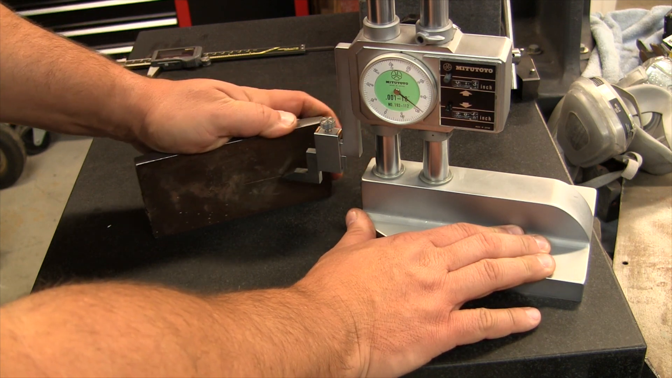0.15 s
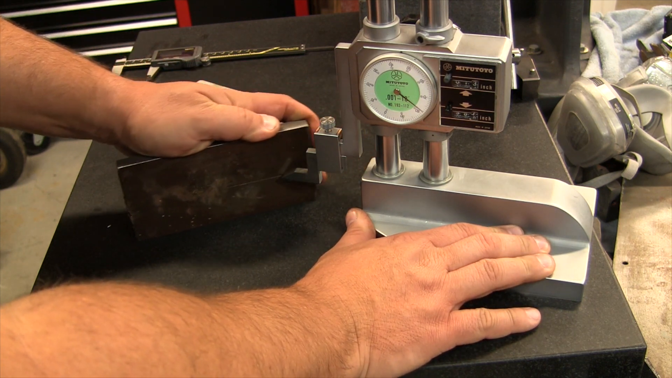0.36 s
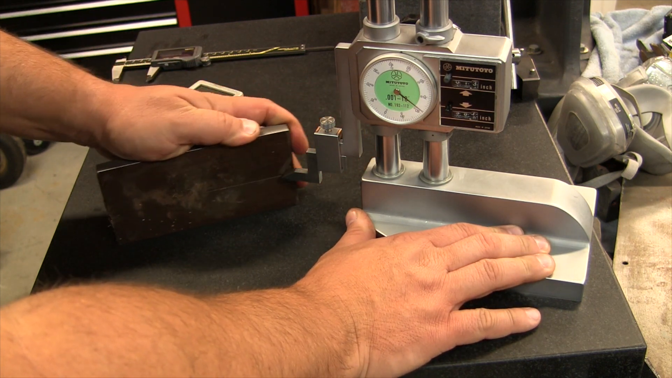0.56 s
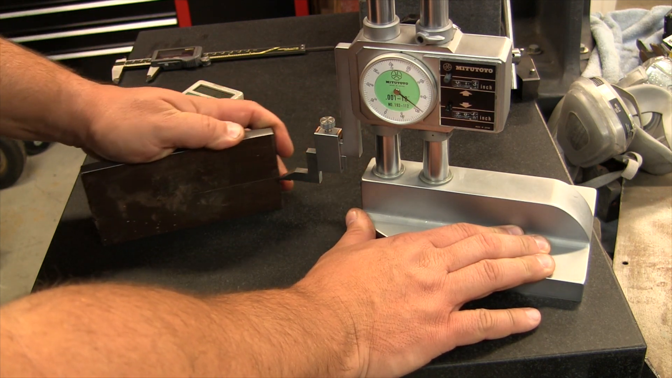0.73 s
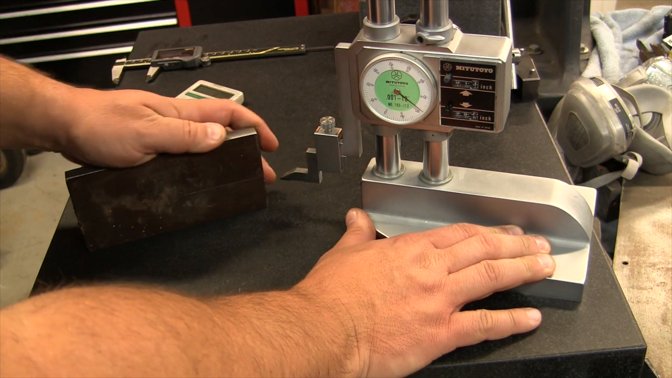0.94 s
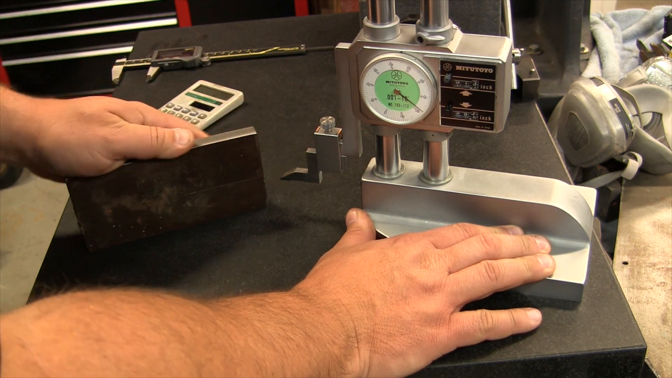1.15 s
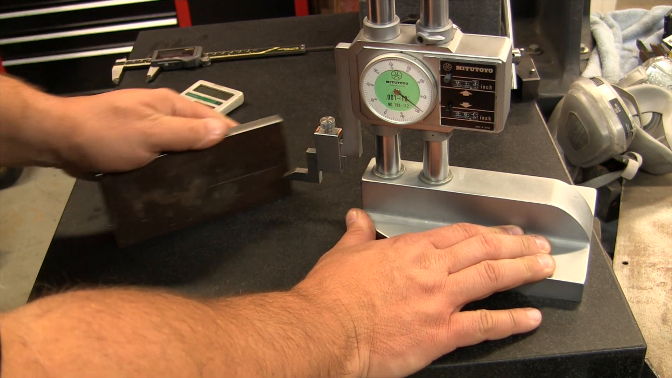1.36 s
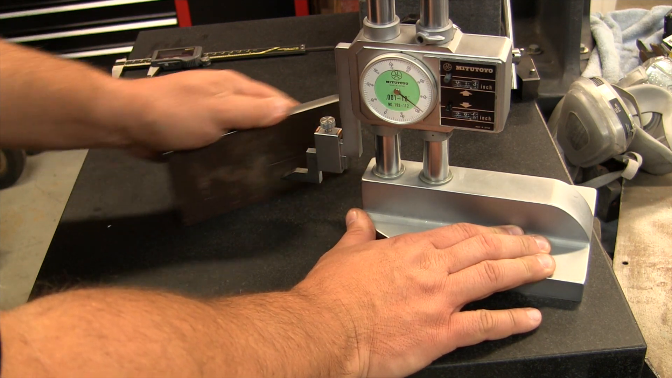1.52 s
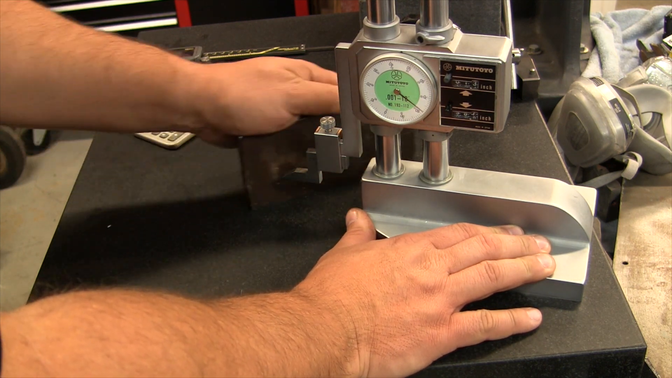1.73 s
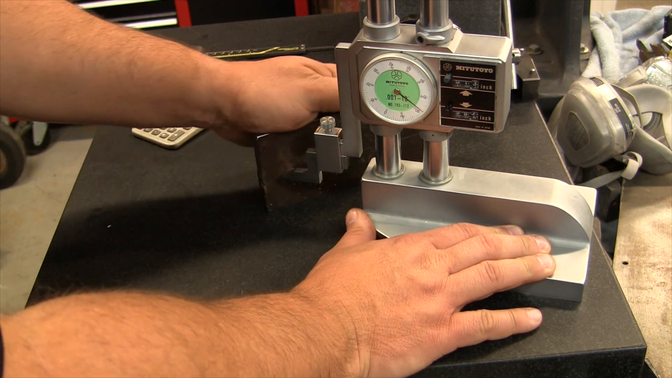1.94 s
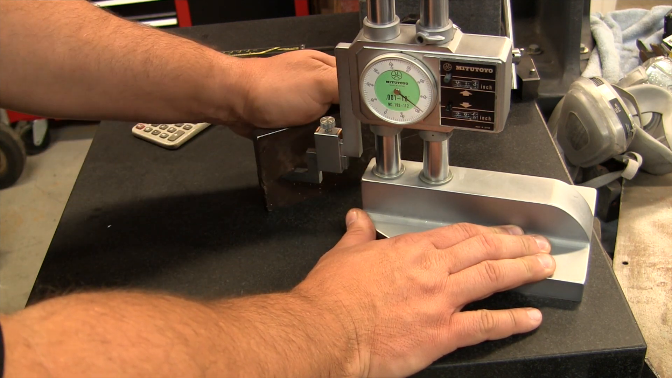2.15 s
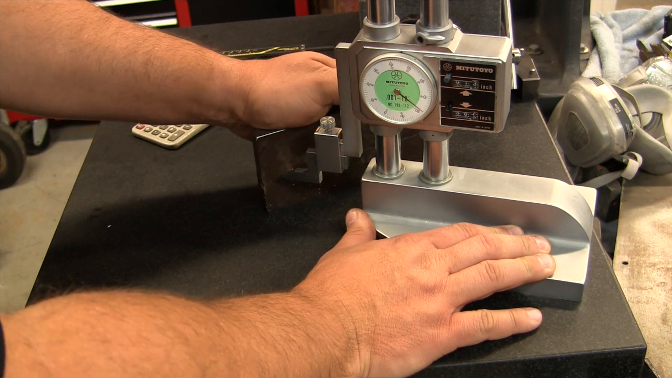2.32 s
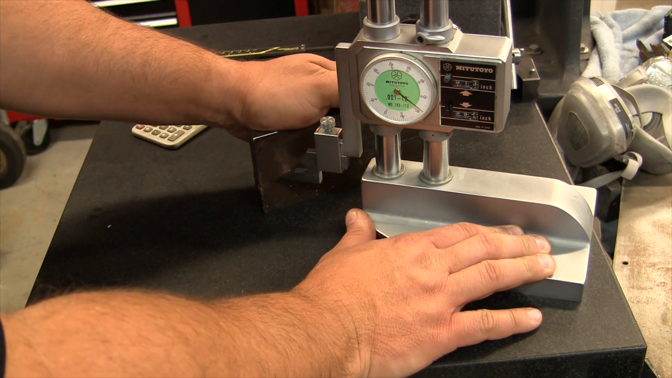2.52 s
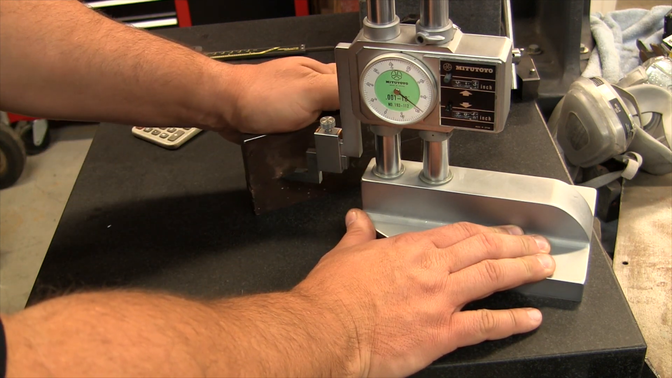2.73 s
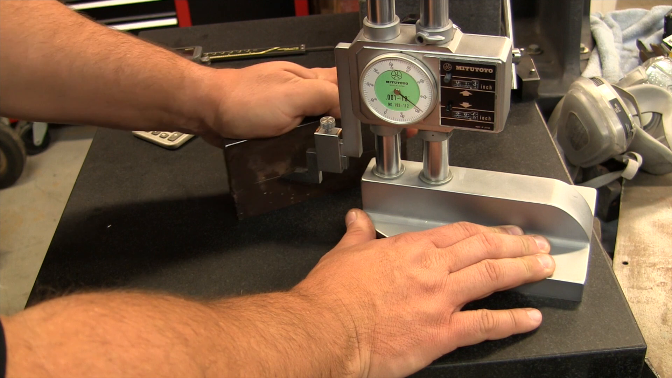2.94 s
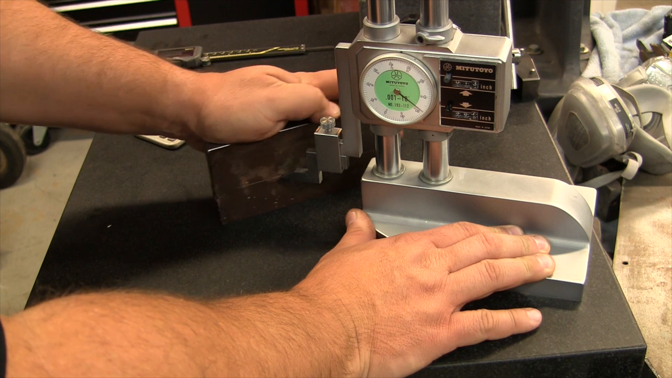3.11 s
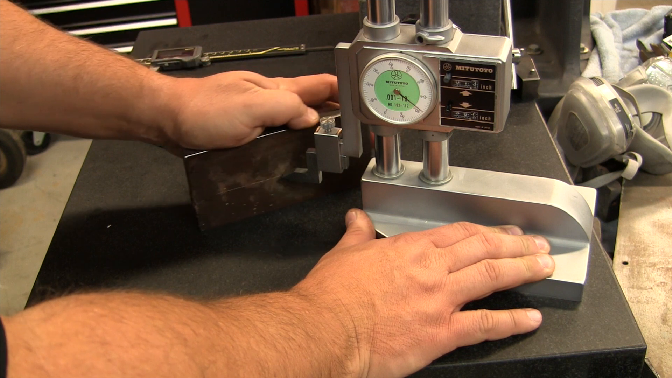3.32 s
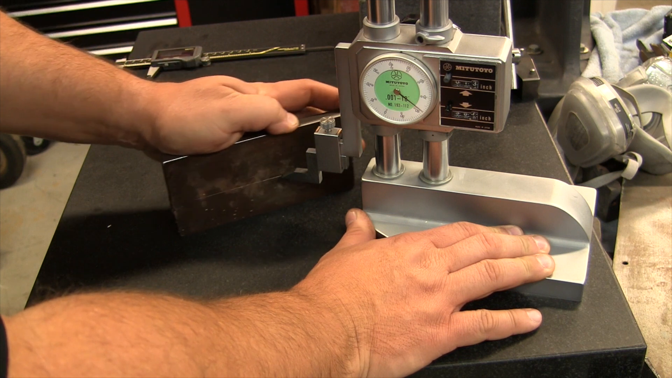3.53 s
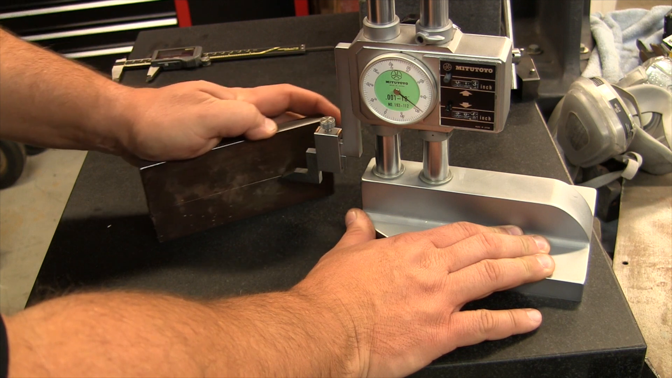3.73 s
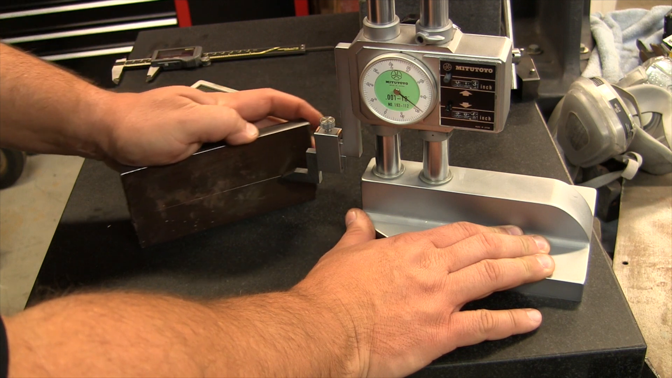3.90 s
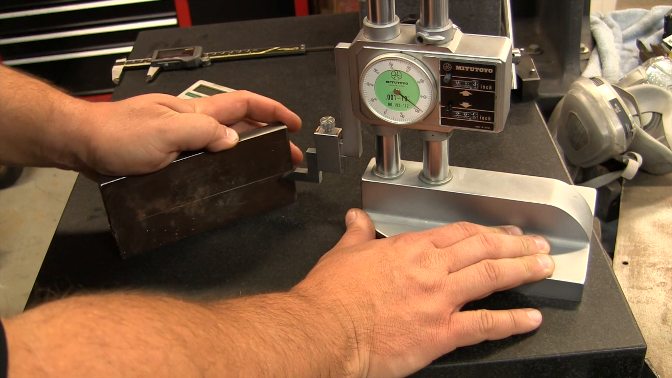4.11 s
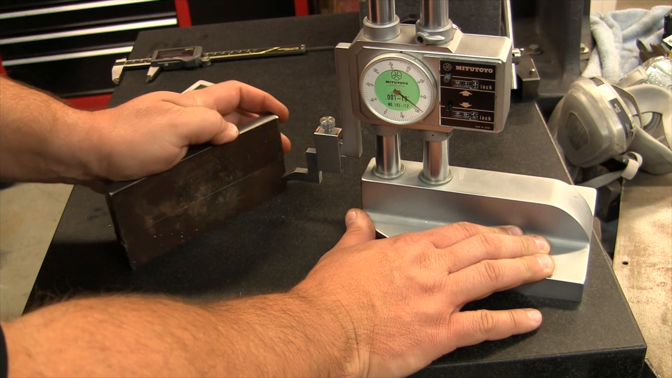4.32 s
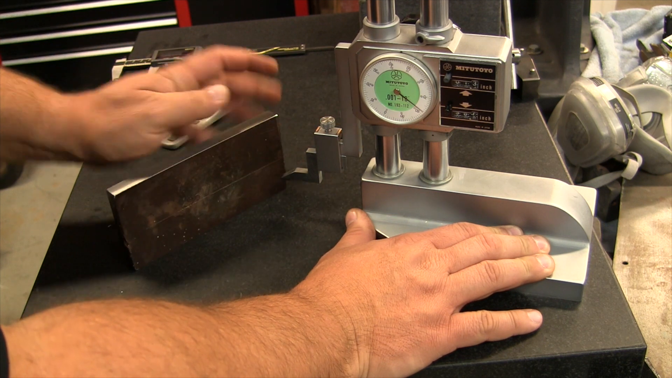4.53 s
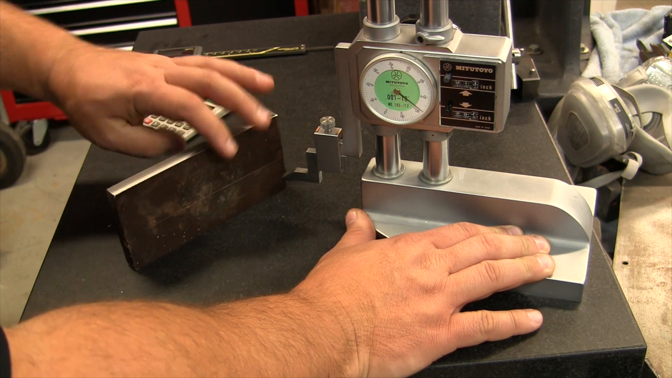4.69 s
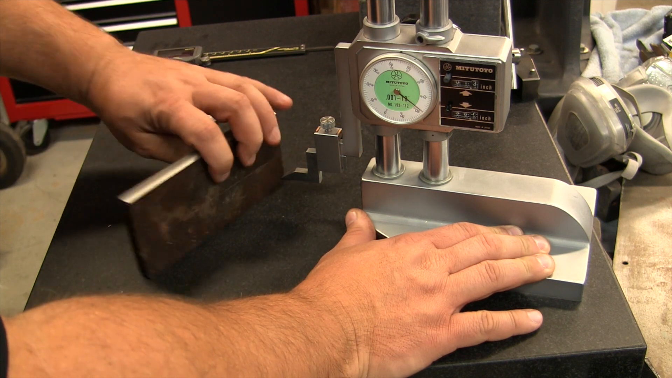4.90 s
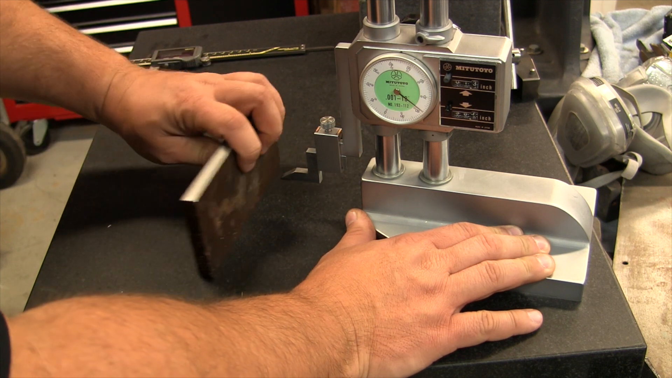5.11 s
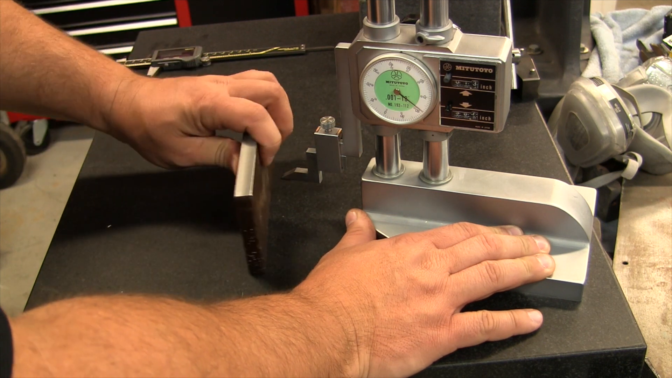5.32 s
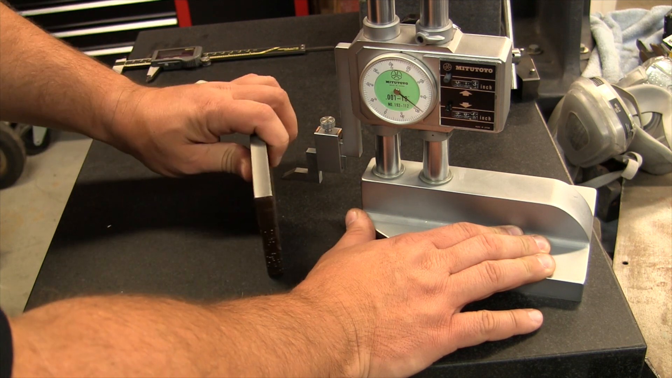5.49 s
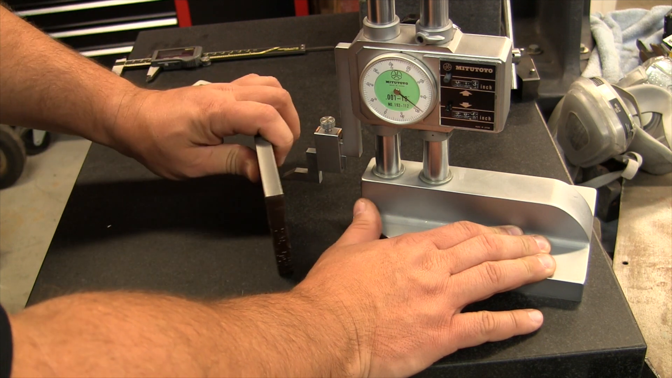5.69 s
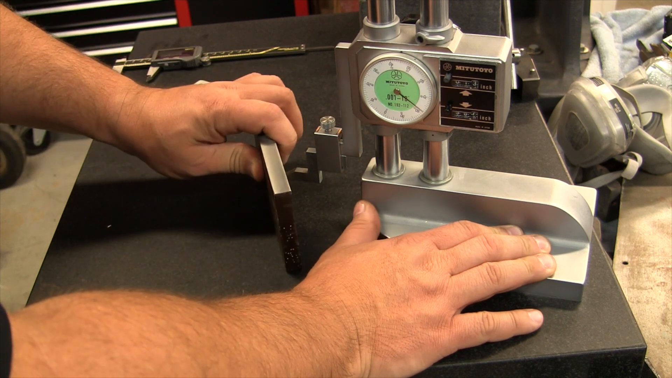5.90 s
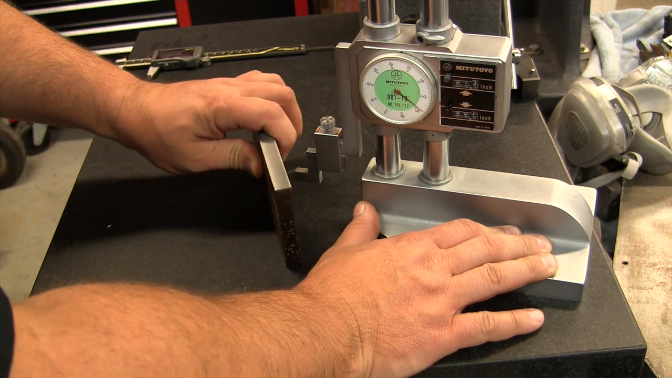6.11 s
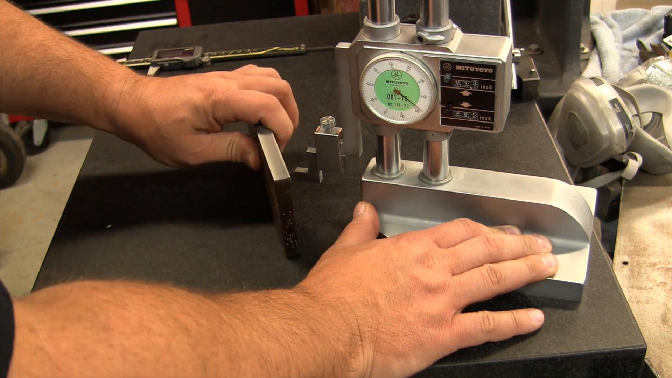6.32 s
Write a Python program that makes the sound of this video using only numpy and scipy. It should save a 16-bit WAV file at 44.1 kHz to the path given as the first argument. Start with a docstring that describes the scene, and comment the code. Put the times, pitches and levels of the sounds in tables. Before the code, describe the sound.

A hard steel point scratches metal twice with sharp snaps; the block rasps and squeaks over granite and knocks once brightly, over faint fan hum.

```python
"""First comes a harsh scrape: a steel block is pulled past the pointed tip (scriber) of a height gauge.
A second long scrape follows later; tiny random slips shake the tip and the gauge, with sharp snaps.
Between and after these, the block rasps and squeals on a granite plate as grit drives its vibrations.
It grinds on its corners and knocks on the stone with thuds and one strong ring; the gauge is nudged.
Behind it all, in a small workshop, are soft air noise and the steady tones of a fan motor."""
import sys
import numpy as np
from scipy import signal
from scipy.fft import rfft, irfft
from scipy.io import wavfile
from scipy.ndimage import uniform_filter1d

SR = 44100
rng = np.random.default_rng(int(sys.argv[2]) if len(sys.argv) > 2 else 0)


def output_pcm(signal):
    """Save a mono or channel-first signal as 16-bit PCM at the path in sys.argv[1].

    Samples are clipped to [-1, 1] before scaling.
    """
    pcm = np.clip(np.atleast_2d(signal).T, -1, 1) * 32767
    wavfile.write(sys.argv[1], SR, np.round(pcm).astype(np.int16))


N = 280035
T = np.arange(N) / SR  # time in seconds
RING_T = T[:SR // 2]  # time axis of short sounds: half a second

# Levels in the tables are starting points: the functions below add small trims.
# the steel is drawn past the tip: start t/s, rise t/s, hold t/s, release t/s, drag level/dB, bite level/dB
STROKES = [(0.0, 0.0033, 0.723, 0.078, -34.5, -47), (2.388, 0.005, 0.04, 0.037, -43, -63),
           (2.543, 0.054, 1.434, 0.035, -34.5, -48.5)]
# the tip digs deeper for a moment: t/s, half length t/s, extra bite level/dB
DIGS = [(0.042, 0.014, 10), (0.393, 0.051, 2.5), (0.499, 0.033, 10), (0.577, 0.02, 6), (0.695, 0.035, 6.5),
        (2.582, 0.037, 14), (2.98, 0.13, 8), (3.042, 0.011, 4.5), (3.071, 0.029, 8), (3.111, 0.012, 7),
        (3.229, 0.022, 6.5), (3.42, 0.03, 6), (4.007, 0.035, 5.5)]
# the blade judders as it runs off the end: start t/s, rise t/s, hold t/s, release t/s, level/dB
JUDDER = [(3.935, 0.016, 0.002, 0.0052, -31), (3.978, 0.033, 0.0047, 0.021, -22),
          (4.05, 0.02, 0.158, 0.04, -46)]
# the tip catches and snaps free: t/s, snap level/dB, blade swing level/dB
CATCHES = [(0.0412, -50, -55), (.1595, -52, -26), (0.331, -37, -40), (.396, -34, -33), (0.478, -43, -37),
           (.495, -42, -33), (0.6994, -29.5, -26), (0.731, -28, -26.5), (2.3875, -43, -32.5),
           (2.7242, -27, -22), (3.0289, -18.5, -20), (3.038, -21, -32), (3.049, -42, -23),
           (3.1118, -23, -19.5), (3.1903, -22, -23.5), (3.298, -33.5, -17), (3.4534, -35.5, -22.5),
           (3.515, -35.5, -19.5), (3.9922, -47, -22)]
# resonances of the gauge and its blade: f/Hz, width while scraping f/Hz, level/dB
GAUGE = [(312.4, 28, -18), (507, 43, -11), (505.5, 17, -7.5), (602, 118, -4.5), (662, 25, -5.5),
         (918.4, 79, 3), (969, 136, 2), (1070, 23, -20), (1160, 31, -25), (1546, 65, -9), (1790, 20, -59),
         (2158, 48, -14.5), (2227, 16, -18.5), (2550, 44, -11), (2814, 96, -15.5), (3355, 27, -14.5),
         (3330, 210, -15), (3720, 110, -39.5)]
# resonances of the tip: f/Hz, width f/Hz, level/dB
TIP = [(4017, 47, 7), (4593, 79, 3.5), (4850, 270, 5.5), (4930, 43, 5.5), (5074, 100, 1), (5400, 150, -5),
       (5590, 60, 2.5), (5850, 860, 3.5), (7080, 140, -2.5), (7620, 83, -5), (7700, 750, -18),
       (8260, 100, -5), (9380, 410, -9), (9750, 140, -5), (11100, 350, -5), (14400, 110, -17)]
# spectrum of the noise from scratched steel: f/Hz, level/dB
SCRATCH = [(100, -7), (200, -1.5), (450, -20), (750, 9.5), (1300, 7), (2000, 1.5), (2800, 0), (3800, -5),
           (6000, -32.5), (11000, -24), (16000, -50)]
# pushes of the block over the stone: start t/s, rise t/s, hold t/s, release t/s,
# grit level/dB, bending modes level/dB, twisting modes level/dB, overtones level/dB
SLIDES = [ (0.73, 0.016, 0.13, 0.095, -43.5, -43, -52, -69),
          (1.25, 0.13, 0.3, 0.15, -36, -39.5, -35.5, -57.5),
          (2.335, 0.055, 0.015, 0.02, -51.5, -47.5, -51, -76),
          (3.97, 0.036, 0.09, 0.028, -41, -54, -51, -79), (4.09, 0.051, 0.27, 0.035, -49, -40, -54, -73.5),
          (4.855, 0.035, 0.026, 0.005, -48.5, -55.5, -41.5, -57),
          (4.935, 0.028, 0.062, 0.042, -36, -28, -24, -74), (5.06, 0.031, 0.13, 0.27, -45, -44.5, -59, -71),
          (5.71, 0.1, 0.011, 0.01, -51, -45.5, -65, -77), (6.09, 0.076, 0.1, 0.095, -43.5, -46, -65, -76), ]
# the block grips the stone and squeals: t/s, half length t/s,
# bending modes level/dB, twisting modes level/dB, overtones level/dB
SQUEALS = [(1.3, 0.018, -43, -71, -55.5), (1.524, 0.06, -33, -51, -54.5), (1.574, 0.017, -26.5, -48, -70),
           (1.621, 0.016, -21, -44, -66), (4.2, 0.022, -32.5, -58.5, -80), (4.283, 0.027, -54, -40, -73),
           (4.369, 0.025, -30, -32, -66), (5.183, 0.078, -43.5, -42, -71),
           (5.282, 0.022, -34.5, -41.5, -62), (5.355, 0.019, -38, -66, -80), (5.49, 0.056, -55, -76, -85),
           (5.804, 0.0077, -38.5, -64, -82), (6.254, 0.022, -41.5, -56, -69)]
# vibrations (modes) of the block: f/Hz, width when tilted f/Hz, rubbed level/dB, struck level/dB,
# family (0 bending, 1 twisting, 2 overtones)
BLOCK = [(2594, 10.3, 2, -36, 0), (3294, 19, -5, 2, 1), (4380, 130, -18, -33, 1), (5700, 160, -33, -31, 1),
         (6970, 11, -33.5, -27.5, 1), (6924, 30, -21, -27.5, 0), (6000, 38, 1.5, -34, 2),
         (10600, 30, 4, -48, 2), (11260, 14, -3, -39, 2), (11800, 20, -12, -55.5, 2),
         (12600, 22, -4.5, -45.5, 2)]
# resonances of the stone under the sliding block: f/Hz, width f/Hz, level/dB
SLAB = [(1303, 38, -8), (1616, 45, 5.5), (1706, 29, 2), (1764, 83, 6), (1924, 35, -2.5), (2080, 30, 2.5),
        (2135, 35, -4.5), (2202, 35, -1.5), (2380, 110, 1), (2470, 12, -1), (2690, 17, -3),
        (3110, 100, -17), (3593, 120, -6.5), (3640, 23, -37.5)]
# spectrum of the grit: f/Hz, level/dB
GRIT = [(90, -49), (200, -10), (500, -12), (1100, -12), (1480, -1), (1650, -0.5), (2100, -3.5),
        (2500, -5.5), (2950, 0.5), (3450, -17), (3900, -16.5), (6800, -19), (8000, -28.5), (16000, -43)]
# the block grinds on a corner as it turns: start t/s, rise t/s, hold t/s, release t/s, level/dB
GRINDS = [(4.05, 0.019, 0.019, 0.035, -36.5), (4.845, 0.07, 0.02, 0.018, -40),
          (4.95, 0.047, 0.035, 0.093, -35), (5.812, 0.013, 0.021, 0.034, -42.5)]
# spectrum of the rubbed stone: f/Hz, level/dB
STONE = [(60, -46), (150, -9), (400, -3.5), (620, 0), (1000, 0.5), (1220, 3.5), (1500, -1.5), (2400, -20),
         (3600, -28), (5000, -42), (7500, -42), (11200, -39), (16000, -52.5)]
# the block meets the stone: t/s, thud level/dB, ring level/dB, wait until the edge lies flat t/s
KNOCKS = [(4.4935, -32, -60, 0.009), (4.9127, -14.5, 0, 0.028), (4.9444, -22, -38, 0.0024),
          (5.8067, -19, -61, 0.0061)]
# spectrum of a thud: f/Hz, level/dB
BLOW = [(40, -12.5), (200, -20), (430, 8), (1200, 12.5), (2300, 3), (3600, -6.5), (5000, -7), (7000, -21),
        (8300, -26), (9800, -27.5), (12000, -38), (16000, -28.5)]
# the gauge's foot is nudged: start t/s, rise t/s, hold t/s, release t/s, body level/dB, rasp level/dB
NUDGE = [(6.105, 0.094, 0.07, 0.054, -40, -49.5), (6.155, 0.018, 0.0044, 0.0054, -40.5, -50)]
# spectrum of the workshop air: f/Hz, level/dB
SHOP = [(20, -6), (50, -36.5), (97, -14.5), (130, -7.5), (200, -4), (380, -4), (480, -7.5), (850, -3.5),
        (1440, -10.5), (2300, -12), (4030, -16.5), (8000, -26.5), (16000, -30.5)]
# fan motor tones: f/Hz, level/dB
HUM = [(198.5, -63.5), (237, -65.5), (362, -65), (397.5, -63.5), (613.7, -65), (769.8, -87), (829, -62.5),
       (947.5, -64), (1009, -100)]

LIGHT_START_DB, LEAN_IN_S = -7, 0.34  # the hand starts each stroke lightly and leans in
DRAG_SHARE = 0.49  # dB of drag for each dB of extra bite from a dig
TILTED_S = 3.0  # from this time the block rides on an edge
BRAKING = 1.31  # above 1, a move dies away ever faster as friction stops it
TOP_HZ = 15900  # highest frequency let through


def scriber():
    """The tip ploughs the steel: each slip shakes the gauge, and its sharp part rings the tip itself."""
    drag, bite = pressure()
    slips = above(friction(rate=2600, spread_db=-0.5, patchy_db=-0.5, patch_rate=130), 120)

    scratch = unit(through(slips, colour(SCRATCH)))
    body = unit(through(slips, modes(GAUGE))) + undb(-1.5) * scratch
    body = unit(held(body, 0.02), 750, 1210)

    edge = above(slips, 2500) * undb(0.53 * walk(120))  # the tip cuts now cleanly, now bluntly
    hiss = through(edge, colour([(3000, -18), (6000, 8), (11500, -7.5), (12500, -10), (16000, -18)]))
    tip = unit(through(edge, modes(TIP))) + undb(-9) * unit(hiss)
    tip = unit(held(tip, 0.037), 3900, 12000)

    blade = through(above(slips, 900), modes([(576, 24, 0)]))
    judder = held(blade, 0.046) * gains(JUDDER)[0]
    return undb(-0.84) * drag * body + undb(-2) * bite * tip + undb(-0.5) * judder


def pressure():
    """Drag and bite of the tip: both grow as the hand leans in, and jump where the tip digs."""
    lean_db = 0
    for start_s, *_ in STROKES:
        fade = np.exp(-np.abs(T - start_s) / LEAN_IN_S)
        lean_db = lean_db + LIGHT_START_DB * (T >= start_s) * fade
    dig_db = sum(extra_db * swell(s, half_s) for s, half_s, extra_db in DIGS)
    drag, bite = gains(STROKES)
    return drag * undb(lean_db + DRAG_SHARE * dig_db), bite * undb(lean_db + dig_db)


def catches(width_factor=0.63):
    """The tip snaps free with a tick; the heavier blade swings just after, ringing longer than in a scrape."""
    out = np.zeros(N)
    # a narrower resonance rings longer
    swing = above(modes([(hz, width * width_factor, db) for hz, width, db in GAUGE]), 470)
    tick = above(modes(TIP), 2100)
    for s, snap_db, swing_db in CATCHES:
        force = above(burst(0.0028), 270)
        add(out, s, tick, snap_db - 1.5)
        add(out, s, through(force, tick), snap_db - 17)
        add(out, s + 0.00057, through(force, colour(SCRATCH)), swing_db - 7)
        add(out, s + 0.00207, swing, swing_db + 0.5)
    return out


def sliding(flat_damping=3.5):
    """The stone's grain rasps under the block and drives the block's own vibrations."""
    grit, *drives = gains(SLIDES)
    grain = friction(rate=6100, spread_db=4, patchy_db=3.5, patch_rate=90)
    force = above(grain, 1320)  # a small contact radiates little bass
    rasp = unit(through(force, modes(SLAB))) + undb(-6) * unit(through(grain, colour(GRIT)))
    out = grit * unit(held(rasp, 0.01), 1550, 2440)

    for family, drive in enumerate(np.array(drives) + squeals()):
        rows = [row[:3] for row in BLOCK if round(row[4]) == family]
        # pressed flat at first, the block is damped; later, tilted, it rings more freely
        pressed = modes([(hz, width * flat_damping, db) for hz, width, db in rows])
        flat_ring = through(force * (T < TILTED_S), pressed)
        tilted_ring = through(force * (T >= TILTED_S), modes(rows))
        # it radiates well only near its modes, so little sounds in the gaps between them
        radiation = modes([(hz, 11 * width, 10 * np.log10(30 / width)) for hz, width, db in rows])
        out += undb(-1) * drive * held(through(flat_ring + tilted_ring, radiation), 0.012)
    return out


def squeals():
    """Extra drive on each family of the block's modes while the block grips the stone."""
    return sum(np.outer(undb(levels_db), swell(s, half_s)) for s, half_s, *levels_db in SQUEALS)


def grinding():
    """On a corner the block bites coarsely, and fewer slips per second sound the stone itself."""
    grain = friction(rate=2500, spread_db=-2, patchy_db=-1, patch_rate=90)
    return gains(GRINDS)[0] * unit(held(through(grain, colour(STONE)), 0.03), 450, 1600)


def knocks(free_decay_s=0.019, flat_decay_s=0.0047, contact_s=0.000068):
    """A thud of stone and a ring of steel, which dies faster once the edge lies flat."""
    out = np.zeros(N)
    tone = sum(undb(row[3]) * np.sin(2 * np.pi * row[0] * RING_T) for row in BLOCK)
    tone = above(tone * (1 - np.exp(-RING_T / contact_s)), 1200)
    for s, thud_db, ring_db, flat_s in KNOCKS:
        add(out, s, through(burst(0.0066), colour(BLOW)), thud_db)
        time_flat = np.maximum(RING_T - flat_s, 0)
        decay = np.exp(-RING_T / free_decay_s - time_flat / flat_decay_s)
        add(out, s, tone * decay, ring_db)
    return out


def nudge():
    """The broad foot rubs the stone and shakes the same gauge, with less top treble than the tip."""
    level, rasp = gains(NUDGE)
    slips = above(friction(rate=4500, spread_db=1, patchy_db=3, patch_rate=190), 130)
    body = unit(through(slips, colour(STONE))) + undb(0.5) * unit(through(slips, modes(GAUGE)))
    body = unit(held(body, 0.024), 450, 1500)
    hiss = through(above(slips, 3300), modes(TIP))
    hiss = through(hiss, colour([(3500, 0), (5000, 6), (6500, -8), (12000, -3)]))
    hiss = unit(held(hiss, 0.084), 3960, 6000)
    return undb(2) * level * body + undb(-0.8) * rasp * hiss


def workshop():
    """Coloured air noise, and fan motor tones that waver a little in pitch and level."""
    air = unit(through(rng.standard_normal(N), colour(SHOP)))
    air = air * undb(-51.5 + 0.27 * walk(1.3))
    hum = 0
    for hz, db in HUM:
        level = undb(db + 0.29 * walk(5.5)) * np.sqrt(2)  # a sine peaks at root 2 times its rms
        phase = 2 * np.pi * np.cumsum(hz + 1.25 * walk(12)) / SR
        hum = hum + level * np.sin(phase)
    return air + hum


def room(x, t60_s=0.55, wet_db=-9, first_s=0.0092):
    """Dull, diffuse reflections from cabinets and walls, as noise that fades by 60 dB in t60_s."""
    tail = rng.standard_normal(len(RING_T)) * undb(-60 * RING_T / t60_s) * (RING_T > first_s)
    tail = tail / np.sqrt(np.sum(tail ** 2))
    walls = colour([(200, 0), (2000, 0), (3300, -3), (12000, -7)])
    return x + undb(wet_db) * through(x, through(tail, walls))


def friction(rate, spread_db, patchy_db, patch_rate):
    """Random tiny slips, on average `rate` a second, of unequal force that also varies in patches."""
    slips = (rng.random(N) < rate / SR) * rng.standard_normal(N)
    unequal = spread_db * np.minimum(rng.exponential(size=N), 4)
    return slips * undb(unequal + patchy_db * walk(patch_rate))


def burst(decay_s):
    """A contact that crumbles into fading micro-impacts, made of decaying noise."""
    return rng.standard_normal(len(RING_T)) * np.exp(-RING_T / decay_s)


def modes(rows):
    """Sum of ringing sines (f/Hz, width f/Hz, energy level/dB); a wider mode dies sooner."""
    total = 0
    for k, (hz, width, db) in enumerate(rows):
        size = (-1) ** k * undb(db) * np.sqrt(width)  # neighbours start in opposite directions
        total = total + size * np.exp(-np.pi * width * RING_T) * np.sin(2 * np.pi * hz * RING_T)
    return total


def colour(points, size=2048):
    """Short filter with a given spectrum whose energy comes as early as possible (minimum phase)."""
    hz, db = np.transpose(points)
    f = np.maximum(np.arange(size // 2 + 1) * SR / size, 1)
    cepstrum = irfft(np.log(undb(np.interp(np.log(f), np.log(hz), db))))
    # fold the second half onto the first, so nothing sounds before the force
    cepstrum[1:size // 2] *= 2
    cepstrum[size // 2 + 1:] = 0
    return irfft(np.exp(rfft(cepstrum)))


def through(x, response):
    """Pass a force through a body or a room (convolution)."""
    return signal.fftconvolve(x, response)[:len(x)]


def above(x, edge_hz):
    """Keep what lies above a frequency (second-order high-pass)."""
    return signal.sosfilt(signal.butter(2, edge_hz, "high", fs=SR, output="sos"), x)


def held(x, seconds):
    """Even out swells lasting longer than this, dividing by the smoothed running level."""
    width = int(seconds * SR)
    power = uniform_filter1d(x ** 2, width)
    return x / np.sqrt(uniform_filter1d(power, width) + 1e-18)


def unit(x, lo_hz=20, hi_hz=20000):
    """Scale a sound so that its part within a frequency band has rms 1."""
    f = np.arange(len(x) // 2 + 1) * SR / len(x)
    band = (f >= lo_hz) & (f <= hi_hz)
    return x * len(x) / np.sqrt(2 * np.sum(np.abs(rfft(x)[band]) ** 2))


def gains(rows):
    """Each level column as a gain over time: a move gathers speed, holds it and dies away."""
    total = 0
    for start_s, rise_s, hold_s, release_s, *levels_db in rows:
        age = T - start_s
        rise = np.clip(age / rise_s, 0, 1)
        fall = np.exp(-np.clip((age - rise_s - hold_s) / release_s, 0, 9) ** BRAKING)
        total = total + np.outer(undb(levels_db), rise * fall)
    return total


def swell(s, half_s):
    """A bell-shaped rise and fall around a moment."""
    return np.exp(-np.minimum(((T - s) / half_s) ** 2, 20))


def walk(rate):
    """Random wander with a spread near 1, heading for `rate` new values a second."""
    return 1.2 * np.interp(T * rate, np.arange(4096), rng.standard_normal(4096))


def add(out, s, x, db):
    """Mix in a short sound at a time and peak level."""
    i = int(s * SR)
    out[i:i + len(x)] += (x * undb(db) / np.abs(x).max())[:N - i]


def undb(db):
    """Decibels to gain."""
    return 10 ** (np.asarray(db) / 20)


def scene():
    """Everything on the plate, with the room's reflections, plus the workshop background."""
    plate = scriber() + catches() + sliding() + grinding() + knocks() + nudge()
    return (room(plate) + workshop())[None]


def record(dry):
    """Round off the loudest peaks and cut the extreme treble."""
    ceiling = 1.6
    rounded = ceiling * np.tanh(dry / ceiling)
    return signal.sosfilt(signal.ellip(10, 0.2, 80, TOP_HZ, fs=SR, output="sos"), rounded)


dry = scene()
out = record(dry)
output_pcm(out)
```